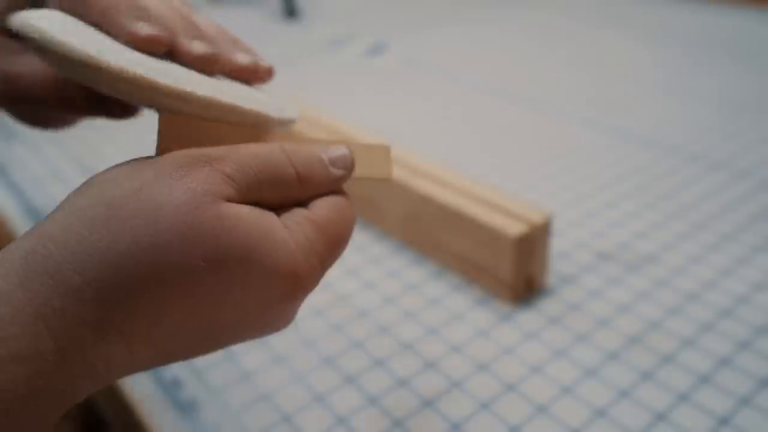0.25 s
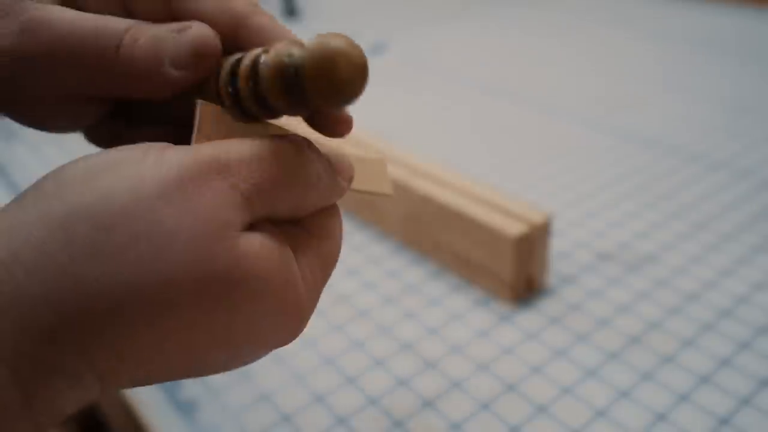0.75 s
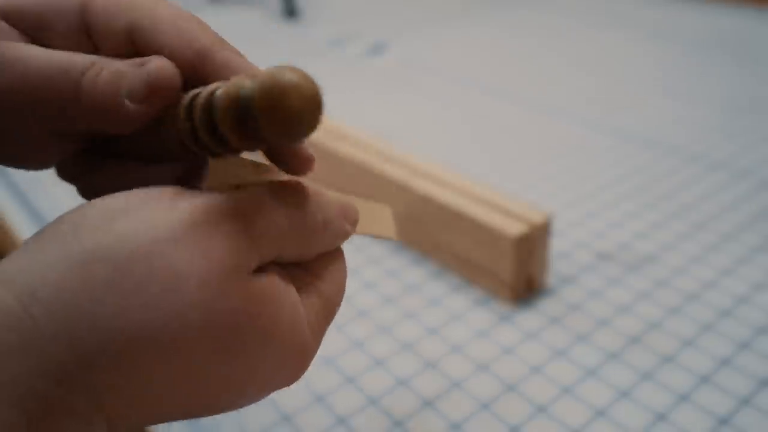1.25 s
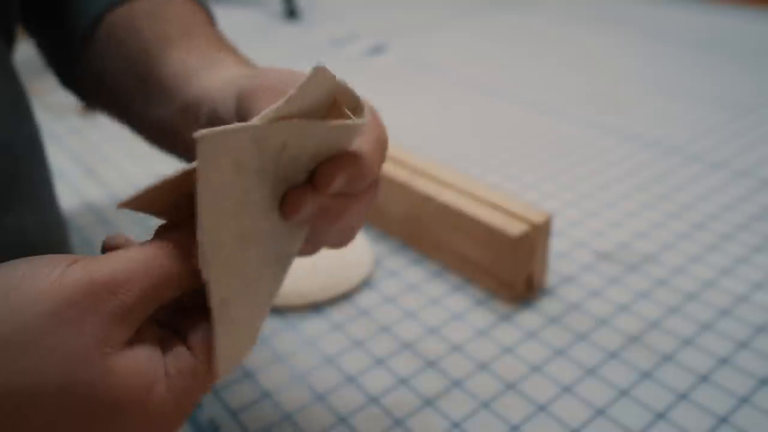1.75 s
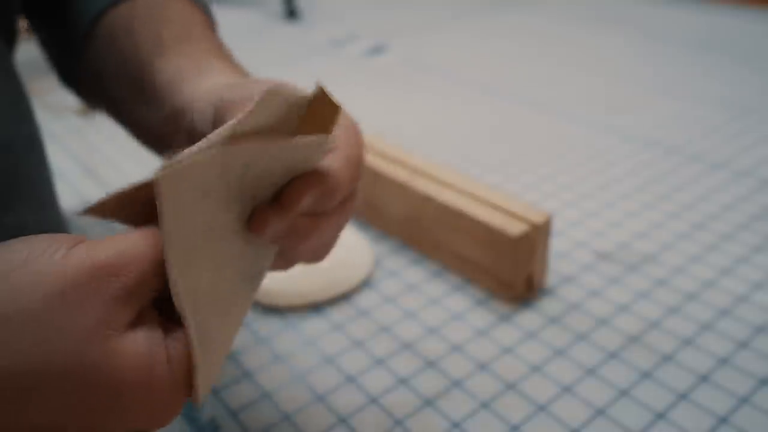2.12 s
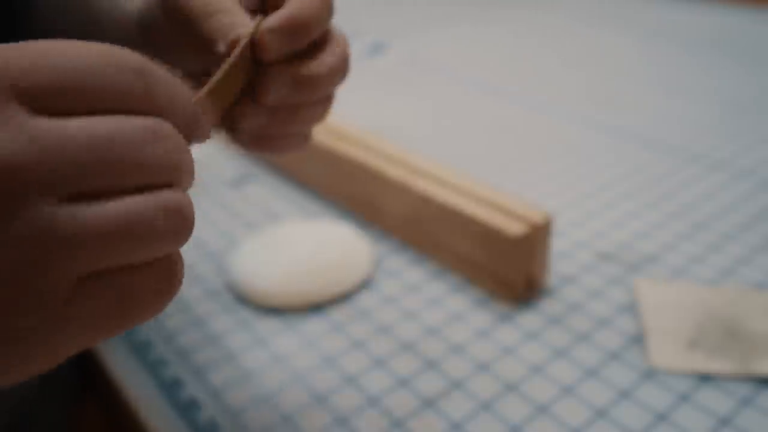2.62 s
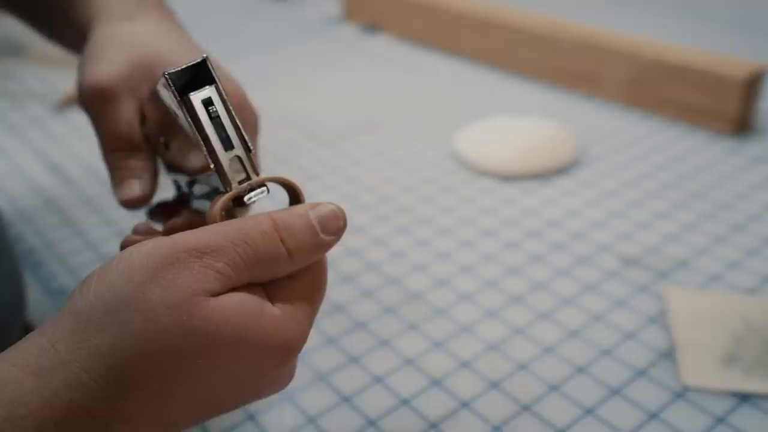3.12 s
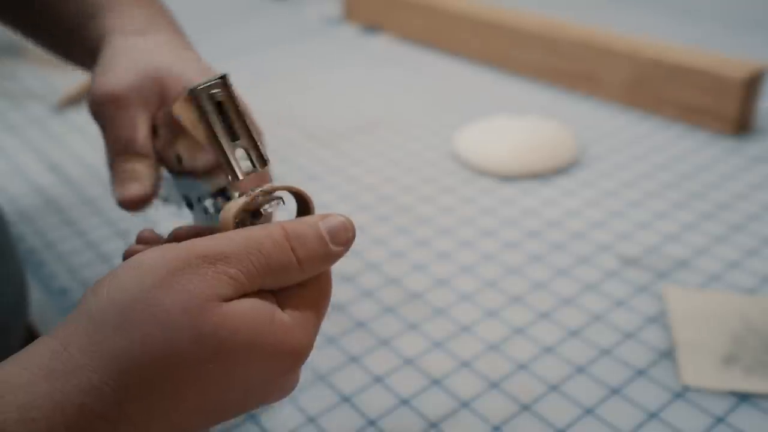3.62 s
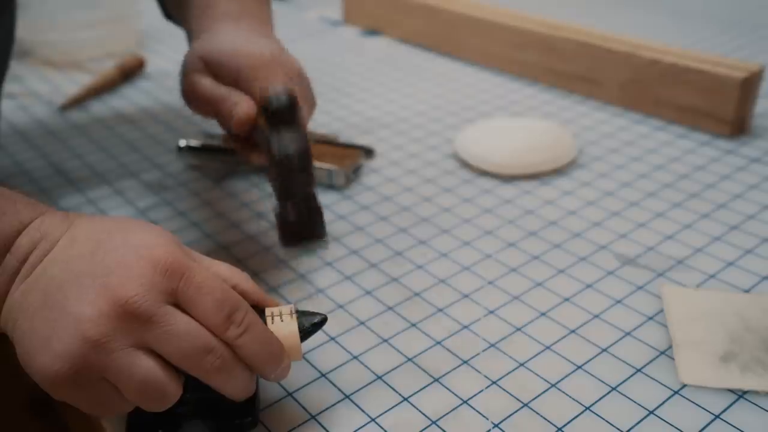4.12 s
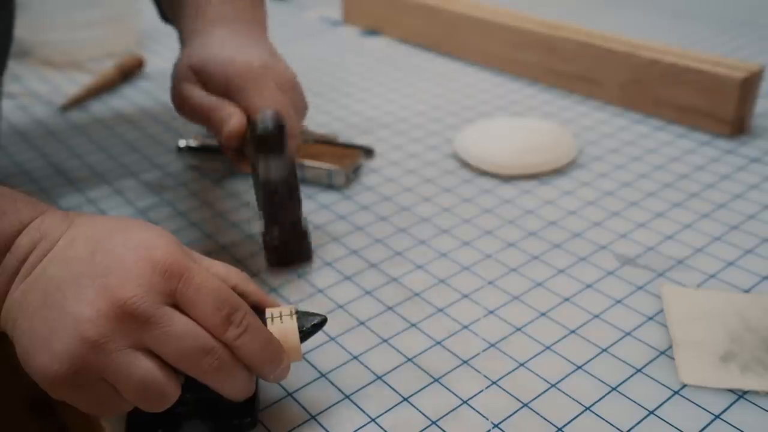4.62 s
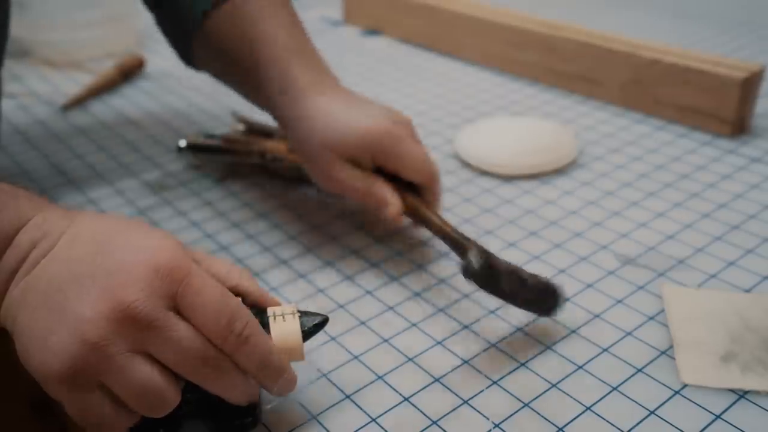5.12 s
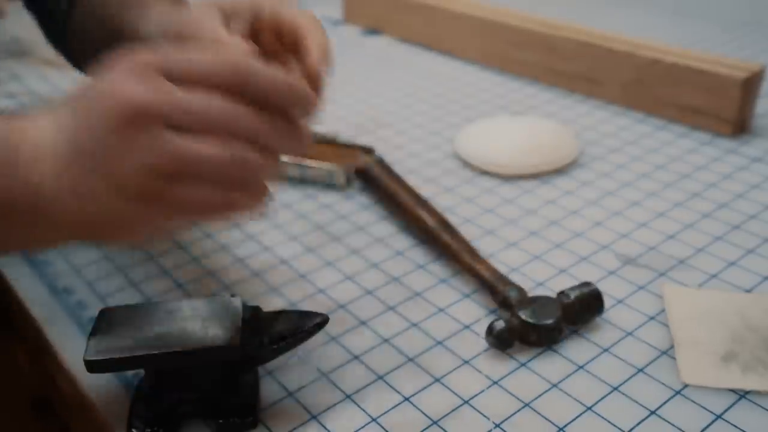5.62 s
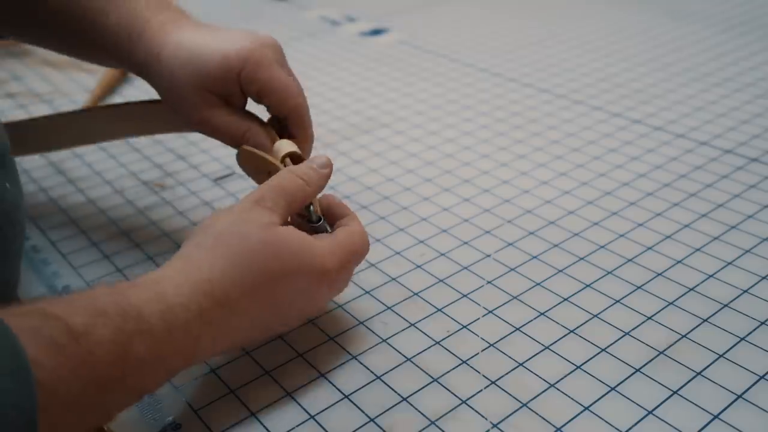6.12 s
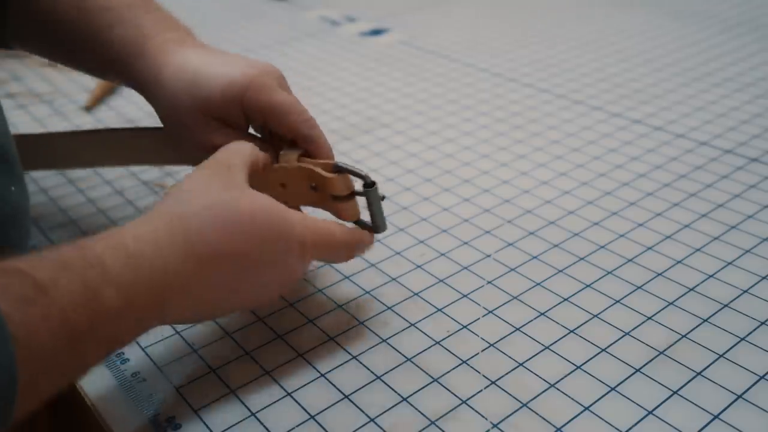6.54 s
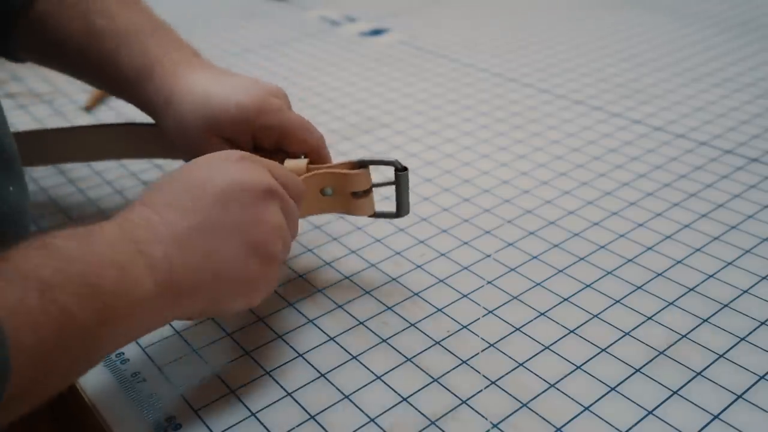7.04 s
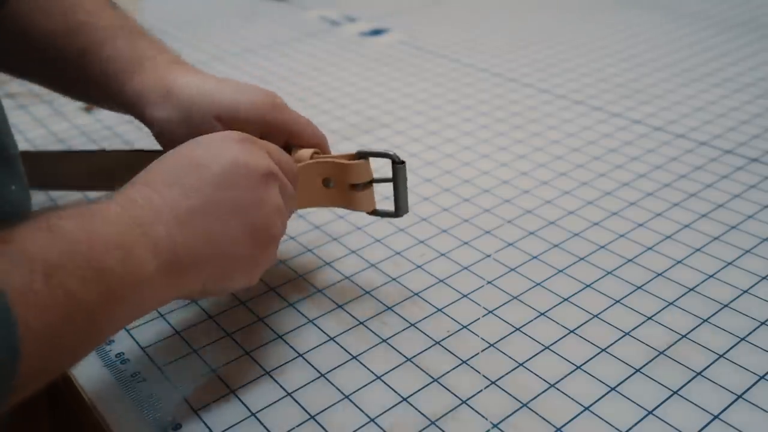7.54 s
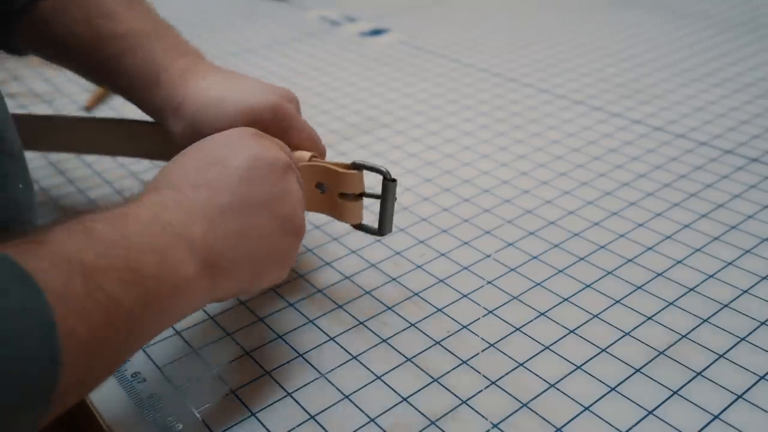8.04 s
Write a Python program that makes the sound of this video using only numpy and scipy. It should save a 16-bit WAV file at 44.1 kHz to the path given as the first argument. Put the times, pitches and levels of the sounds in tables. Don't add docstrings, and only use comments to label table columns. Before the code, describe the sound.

In a bare workshop with soft low ventilation noise and a faint motor whine that comes and goes, close work begins almost silently: a tiny tick or two and a faint stroke. From 0.65 to 1.5 s a wooden tool gives small dry ticks against leather. Quick back-and-forth canvas rubs follow from 1.6 to 2.4 s, then fainter brushing. A stapler clicks at 3.2 s and snaps loudly at 3.48 and 3.66 s, bright steel with a short rattle. Four loud hammer blows land at about 4.0, 4.3, 4.55 and 4.8 s, cracking hard with bench thump and swelling room echo. The hammer knocks down at 5.3 s and settles around 5.5 s. Afterwards fingers rustle on leather with small ticks; a steel buckle tinkles near 6.3 s, then clinks and rattles in a cluster at 7.7 to 8.0 s, ending with slight handling.

```python
import sys
import numpy as np
from scipy import signal
from scipy.fft import rfft, irfft
from scipy.io import wavfile

SR = 44100
rng = np.random.default_rng(int(sys.argv[2]) if len(sys.argv) > 2 else 0)


def dump(signal):
    limited = np.clip(np.atleast_2d(signal).T, -1, 1)
    pcm = np.round(limited * 32767).astype(np.int16)
    wavfile.write(sys.argv[1], SR, pcm)


def amplitude_ratio(level_db):
    exponent = np.asarray(level_db, float) / 20
    return 10 ** exponent


N = 364839


def at_hz(points, hz):
    table_hz, value = np.transpose(points)
    return np.interp(np.log(hz + 1), np.log(table_hz), value)


def rms_one(x):
    return x / np.sqrt(np.mean(x ** 2) + 1e-20)


def colour(x, spectrum):
    size = 8192
    cepstrum = irfft(np.log(amplitude_ratio(at_hz(spectrum, np.fft.rfftfreq(size, 1 / SR)))))
    cepstrum[1:size // 2] *= 2
    cepstrum[size // 2 + 1:] = 0
    response = irfft(np.exp(rfft(cepstrum)))
    return signal.fftconvolve(x, response / np.linalg.norm(response))[:N]


def band(x, low_hz, high_hz):
    edges = [low_hz, min(high_hz, SR / 2.2)]
    return signal.sosfilt(signal.butter(2, edges, "band", fs=SR, output="sos"), x)


def high_pass(x, order, hz):
    return signal.sosfilt(signal.butter(order, hz, "high", fs=SR, output="sos"), x)


def drift(rate_hz):
    r = np.exp(-2 * np.pi * rate_hz / SR)
    return rms_one(signal.lfilter([1], [1, -2 * r, r * r], rng.standard_normal(N + SR))[SR:])


def add(track, s, sound):
    i = round(s * SR)
    track[i:i + len(sound)] += sound[:N - i]


def ring(hz, db, t60):
    t = np.arange(round(1.5 * t60 * SR)) / SR
    return amplitude_ratio(db - 60 * t / t60) * np.sin(2 * np.pi * hz * t)


def strike(times, levels_db, modes, spread_db):
    at, out = np.round(np.asarray(times) * SR).astype(int), np.zeros(N)
    for hz, db, t60 in modes:
        clicks = np.full(N, 1e-18)
        np.add.at(clicks, at, amplitude_ratio(levels_db + db + spread_db * rng.standard_normal(len(at))))
        r, w = amplitude_ratio(-60 / (t60 * SR)), 2 * np.pi * hz / SR
        out += signal.lfilter([0, np.sin(w)], [1, -2 * r * np.cos(w), r * r], clicks)
    return out


def puff(decay_ms):
    t_ms = np.arange(512) / SR * 1000
    return rng.standard_normal(len(t_ms)) * np.exp(-t_ms / decay_ms) * np.minimum(t_ms / 0.13, 1)


# start in seconds, thump in dB, face crack in dB, crack pitch in Hz,
# contact hardness in Hz.
HAMMER_BLOWS = [
    (4.012, 3, 1, 7100, 2248),
    (4.2879, 6.5, 0.5, 8320, 3128),
    (4.5447, 5.5, 3.5, 6350, 14230),
    (4.8296, 6, -2.5, 9800, 2825),
]
# start in seconds, thump in dB, crack in dB, room share in dB.
LANDINGS = [(4.545, -24.5, 4.5, 6), (5.3302, -13, -36, -34), (5.333, -6.5, -20.5, -4.5),
            (5.345, -15, -29, -12), (5.362, -23, -35, -4), (5.506, -27, -41.5, -21),
            (5.5301, -11, -17.5, -6), (5.541, -50, -26, -1), (5.57, -37, -25.5, -7), (5.593, -37, -32, -8),
            (5.98, -38.5, -46.5, 9), (7.735, -21, -24, -1.5), (7.746, -43, -26, -22),
            (7.754, -20, -29, -31), (7.765, -44, -29, -14)]
# start in seconds, thump in dB, room share in dB, hardness in Hz.
BUMPS = [(3.954, -37, 16.5, 1034), (5.299, -30, -1, 1510), (5.301, -25, -9, 593), (5.888, -40, 9.5, 1200),
         (5.9, -22, -9, 1494), (5.996, -45, 6, 3000), (6.029, -50, -1, 1970), (7.588, -36.5, -8.5, 592),
         (7.687, -22, -10, 506), (7.8, -37.5, 9, 912), (8.225, -32.5, -13, 1490)]


def blow_rows():
    rows = [(*row, 1.5 + 0.59 * row[2]) for row in HAMMER_BLOWS]
    rows += [(s, db, crack_db, 3700, 3280, room_db) for s, db, crack_db, room_db in LANDINGS]
    rows += [(s, db, db - 31, 3000, hz, room_db) for s, db, room_db, hz in BUMPS]
    return sorted(rows)


# start in seconds, pitch in Hz, level in dB, decay t60 in seconds.
HAMMER_RING = [
    (4.014, 7600, -34.5, .043),
    (4.019, 13800, -50, .15),
    (4.289, 10200, -36, .05),
    (4.544, 7440, -29.5, .06),
    (4.545, 13010, -48, .15),
    (4.831, 7500, -33, .025),
]


def hammer_head():
    head = np.zeros(N)
    for s, hz, db, t60 in HAMMER_RING:
        add(head, s, ring(hz, db, t60))
    return head * amplitude_ratio(4 * drift(90))


# frequency in Hz, level in dB per Hz.
KNOCK_SPECTRUM = [(59, -27), (100, -16), (772, 3), (2520, -14.5), (3140, -2.5), (5170, -38), (8370, -40.5),
                  (12000, -56), (15600, -89.5), (22000, -120)]
# pitch in Hz, level in dB, decay t60 in seconds.
BENCH_MODES = [(104, -30.5, 0.24), (123, -27, 0.33), (179.5, -28.5, 0.25), (229.8, -19.5, 0.31),
               (306, -16, 0.12), (424, -16.5, 0.084), (607, -20.5, 0.06), (792, -10, 0.035),
               (1000, -9, 0.023), (1200, -15.5, 0.06)]
# pitch in Hz, level in dB, decay t60 in seconds.
HANDLE_MODES = [(523, -14.5, 0.06), (740, -17, 0.073), (964, -21, 0.042), (1427, -30, 0.04)]
# start in
# seconds, pitch in Hz, level in dB, decay t60 in seconds.
THUDS = [(3.224, 300, -43, 0.015), (3.225, 130, -46, .05), (3.48, 139.4, -44.5, .05),
         (3.48, 450.7, -39, 0.018), (3.662, 394.4, -39, 0.013), (5.301, 202, -20.5, 0.052),
         (5.3337, 515, 8.5, 0.0046), (5.3334, 1900, -16, .012), (5.347, 950, -26, .03),
         (5.362, 1800, -36, .015), (5.532, 1200, -26, .015), (5.545, 1000, -32, .04), (6.03, 260, -44, .06),
         (6.07, 310, -46, .06), (7.738, 900, -30, .04), (5.337, 195, -15, 0.089),
         (5.531, 367, -13.5, 0.024), (5.572, 350, -20, 0.024), (5.591, 350, -19, 0.017),
         (7.736, 422, -14.5, 0.016), (7.746, 350, -13.5, 0.012), (7.755, 334, -16, 0.015)]


def bench_top(push, rows):
    s, thump_db = np.array(rows)[:, :2].T
    mat_db = -13 * (s > HAMMER_BLOWS[-1][0])
    modes = strike(s + 0.0012, thump_db + mat_db, BENCH_MODES, spread_db=2)
    near = colour(push, KNOCK_SPECTRUM) + band(modes, 61, 1500)
    for s, db, *_ in LANDINGS:
        for hz, mode_db, t60 in HANDLE_MODES:
            add(near, s, ring(hz, db + mode_db, t60))
    for s, hz, db, t60 in THUDS:
        add(near, s, ring(hz, db, t60))
    return near


# stage start in seconds, weight in dB, bite in dB.
BLOW_COLOUR = [
    (0, 0, 0),
    (4.0, 4.5, -2.5),
    (4.28, -2.5, -0.5),
    (4.53, -8, 3.5),
    (4.82, 0, -4),
    (5.2, 3.5, -11.5),
    (5.5, 3, 4.5),
    (5.8, 4, 8),
    (7.5, 11, 4),
]
# body in dB, edge in dB, crack's room share in dB.
BLOW_BANDS = [(0.5, 0, -0.5), (-2.5, 3, -4), (-1, 3, -3.5), (-0.5, -3, -3.5), (2, -3, 0.5), (-2, 0, 3.5),
              (2, -8, 4.5), (-2.5, 1, 0), (1, -5, 12.5)]
# frequency in Hz, level in dB per Hz.
BENCH_SPECTRUM = [(18, -70.5), (30, -37.5), (112, -2.5), (199, -3.5), (233, -2), (336, -5.5), (426, -4.5),
                  (666, -10.5), (822, -9.5), (1590, -19.5), (2170, -26), (3490, -21.5), (6210, -39),
                  (13300, -48), (16000, -91.5)]


def bench_into_room(far, crack):
    start, weight_db, bite_db = np.transpose(BLOW_COLOUR)
    body_db, edge_db, crack_room_db = np.transpose(BLOW_BANDS)
    stage = np.searchsorted(start * SR, np.arange(N), side="right").clip(1) - 1

    def change(db):
        return (amplitude_ratio(db) - 1)[stage]

    weight = signal.lfilter(*signal.butter(1, 400, "low", fs=SR), far)
    bite = signal.lfilter(*signal.butter(1, 1800, "high", fs=SR), far)
    far = far + change(weight_db) * weight + change(bite_db) * bite
    far = far + change(body_db) * band(far, 800, 2000) + change(edge_db) * band(far, 4000, 6500)
    crack_far = band(crack, 2000, 6500) * amplitude_ratio(crack_room_db + 3)[stage]
    return colour(far, BENCH_SPECTRUM), crack_far


def blows():
    push, far, crack = np.zeros((3, N))
    rows = blow_rows()
    for s, thump_db, crack_db, crack_hz, hardness_hz, room_db in rows:
        contact = signal.unit_impulse(512) + .04 * puff(1.5)
        soft = signal.lfilter(*signal.butter(2, min(hardness_hz, SR / 3), fs=SR), contact)
        soft *= amplitude_ratio(thump_db + 9)
        add(push, s + 0.00084, soft)
        add(far, s + 0.00044, amplitude_ratio(room_db + 2) * soft)
        edge = band(signal.unit_impulse(512, 2) * 3 + puff(.5), crack_hz / 1.5, crack_hz * 1.6)
        edge = band(edge, crack_hz / 2.5, crack_hz * 1.6)
        add(crack, s, amplitude_ratio(crack_db) * edge / np.abs(edge).max())
    near = bench_top(push, rows)
    far, crack_far = bench_into_room(far, crack)
    rumble_cut_hz = 55
    near = high_pass(high_pass(near, 2, rumble_cut_hz), 2, rumble_cut_hz)
    return near, high_pass(far, 2, rumble_cut_hz), crack + hammer_head(), crack_far


# start in seconds, peak in dB, grinding time in ms.
STAPLER_CONTACTS = [(3.2193, -34, 3.2), (3.2238, -11.5, 8.2), (3.235, -18.5, 3.06), (3.241, -27, 2.5),
                    (3.472, -28, 4.3), (3.477, -4, 3.6), (3.481, 2, 5.9), (3.492, -16, 5.5),
                    (3.509, -6, 4.1), (3.630, -17, 4.8), (3.654, -26, 10), (3.6615, 1, 4.24),
                    (3.665, -4.5, 4.37), (3.674, -16.5, 5.6), (3.713, -17, 1.14)]
# from seconds, to seconds.
LATCH_SPANS = [
    (3.5, 3.52),
    (3.62, 3.64),
]
# frequency in Hz, level in dB per Hz.
SNAP_SPECTRUM = [(290, -63.5), (500, -47.5), (1400, 1), (2290, -10), (2730, 1.5), (3390, 5), (5310, -6.5),
                 (12500, -3.5), (16000, -24)]
# frequency in Hz, level in dB per Hz.
LATCH_SPECTRUM = [(900, -27.5), (1500, -14.5), (2400, -17.5), (3400, 7.5), (4300, -3.5), (5250, -0.5),
                  (6300, -8.5), (12000, -8.5), (16000, -24.5)]
BODY_MODES_HZ = [1300, 1440, 1500, 1720, 2870, 3130, 3520, 3820, 4000, 4900, 5230, 7400, 8650, 11400]
# decay t60 in seconds, dB on closing, dB on driving, dB on opening.
BODY_GRIP = [(0.068, -22, -9, -8), (.05, -13.5, -4, -3.5), (.035, -0.5, -9, -11.5), (0.028, 9, -7, -6.5),
             (0.02, -16.5, -3, 6), (0.031, 1, -2, -7), (0.017, -13.5, 2.5, -11), (.035, -8, -8.5, -5.5),
             (0.051, -3.5, -7, -4.5), (.02, -12, -7, -3), (0.014, 6.5, -1, -7),
             (0.019, -15.5, -12.5, -12.5), (.03, -8.5, -16.5, -9), (0.014, -10, -16.5, -16)]
GRIP_CHANGES_S = [3.4, 3.6]
# start in seconds, pitch in Hz, level in dB, decay t60 in seconds.
SPRING = [
    (3.2244, 3681, -50, 1.),
    (3.2244, 8650, -66, .5),
    (3.2244, 7400, -60, .4),
    (3.481, 3686, -44, .2),
]
# start in seconds, pitch in Hz, level in dB, decay t60 in seconds.
MAGAZINE = [(3.2245, 1500, -26, .04), (3.2245, 5200, -28, .03), (3.483, 3500, -18, .04),
            (3.483, 2200, -36, .2), (3.226, 2300, -48, .25), (3.225, 1480, -42, 0.36),
            (3.226, 1725, -44, 0.27), (3.226, 4081, -40, 0.25), (3.225, 3190, -45, 0.23),
            (3.226, 5170, -51, 0.23), (3.483, 1378, -32, 0.28), (3.482, 3000, -33, .3),
            (3.483, 3900, -37, 0.27), (3.664, 1260, -39.5, 0.27), (3.664, 1435, -37.5, 0.31),
            (3.664, 2898, -29, 0.29), (3.664, 3830, -34, 0.25), (3.663, 4050, -39.5, .3)]


def stapler():
    grind, latch, magazine, body = np.zeros((4, N))
    times, levels_db = [], []
    for s, db, ms in STAPLER_CONTACTS:
        t = np.linspace(0, 2, round(2 * ms * SR / 1000))
        shape = np.minimum(t / .15, 1) * np.exp(-t ** 4 * 2)
        is_latch = any(a < s < b for a, b in LATCH_SPANS)
        add(latch if is_latch else grind, s, amplitude_ratio(db - 6.5) * shape * rng.standard_normal(len(t)))
        times += list(s + ms / 1000 * rng.random(6))
        levels_db += [db - 28] * 6
    phase = np.searchsorted(GRIP_CHANGES_S, times)
    for hz, (t60, *grip_db) in zip(BODY_MODES_HZ, BODY_GRIP):
        body += strike(times, np.array(levels_db) + np.array(grip_db)[phase], [(hz, 0, t60)], spread_db=4)
    for s, hz, db, t60 in SPRING:
        add(body, s, ring(hz, db, t60))
    rattle = drift(85)
    for k, (s, hz, db, t60) in enumerate(MAGAZINE):
        tone = ring(hz, db + 3, t60)
        add(magazine, s, tone * np.roll(rattle, -k * SR // 2)[:len(tone)])
    snaps = colour(grind, SNAP_SPECTRUM) + colour(latch, LATCH_SPECTRUM) + body + magazine
    limit = .7
    return band(limit * np.tanh(snaps / limit), 1100, 19000)


# start in seconds, frame in dB, bar in dB, roller in dB, prong in dB.
TOUCHES = [(6.3118, -41.5, -45, -87, -61), (6.3288, -29, -32, -48, -38), (6.336, -34, -37, -65, -49),
           (6.446, -39.5, -47, -48, -46), (6.5463, -41.5, -45, -67, -44), (6.877, -51, -44, -64, -53.5),
           (6.904, -43, -46.5, -59.5, -50.5), (7.3562, -36.5, -48, -60, -41), (7.484, -32, -62, -56, -68),
           (7.549, -43.5, -57, -63, -52), (7.679, -37, -51, -56, -43.5), (7.737, -46, -55, -51, -50),
           (7.7439, -32, -51, -46, -44), (7.765, -43, -54, -52, -60), (7.774, -31, -53, -49, -48),
           (7.776, -37, -52, -42, -38), (7.7878, -32, -49, -46, -43), (7.7936, -31, -41, -29.5, -45),
           (7.7989, -22, -53, -37, -41), (7.804, -26, -56, -38, -42), (7.807, -50, -52, -47, -42),
           (7.955, -22, -35, -39.5, -39)]
# start in seconds, frame in dB.
NUDGES = [(6.235, -51), (6.344, -28.5), (6.368, -38), (6.385, -38), (6.4549, -40), (6.5145, -57),
          (6.5572, -49.5), (6.71, -45.5), (7.368, -46), (7.4675, -40), (7.495, -44.5), (7.5, -55),
          (7.559, -56.5), (7.689, -45), (7.962, -36), (8.044, -40.5), (8.0702, -48.5), (8.2068, -49.5)]
# from seconds, to seconds.
DANGLING = [
    (6.3, 6.4),
    (6.44, 6.45),
    (7.736, 7.95),
]
# pitch in Hz, level in dB, decay t60 in seconds.
FRAME = [(3460, -8, .25), (3620, -19, .15), (3830, -9, .15), (3890, -1, .3), (3955, -3, .25),
         (4390, -16, .12)]
# pitch in Hz, level in dB, decay t60 in seconds.
BAR = [(4720, -13, .08), (5020, -11, .1), (5200, -9, .1), (5270, -4, .11), (5600, -17, .08)]
# pitch in Hz, level in dB, decay t60 in seconds.
ROLLER = [(8560, -10, 0.2), (9870, -4.5, 0.16)]
# pitch in Hz, level in dB, decay t60 in seconds.
PRONG = [(13730, 11, 0.11), (14700, -13, .06)]


def buckle():
    rings, clicks = np.zeros((2, N))
    nudges = [(s, db, db - 23, db - 21, db - 21) for s, db in NUDGES]
    touches = [tuple(row) for row in TOUCHES] + nudges
    for s, frame_db, bar_db, roller_db, prong_db in sorted(touches):
        held = not any(a < s < b for a, b in DANGLING)
        ring_share, loss_db, detune = (.17, -1, .015) if held else (.3, 0, 0)
        parts = [(FRAME, frame_db - 8.5), (BAR, bar_db), (ROLLER, roller_db), (PRONG, prong_db - 11)]
        for modes, part_db in parts:
            for hz, db, t60 in modes:
                luck, bend = rng.standard_normal(2)
                level_db = db + part_db + loss_db + 0.94 * luck
                add(rings, s, ring(hz * (1 + detune * bend), level_db, t60 * ring_share))
        burst = puff(1.0) * amplitude_ratio(0 if held else -14)
        low = amplitude_ratio(frame_db + 14) * band(band(burst, 3440, 4640), 3160, 11900)
        high = (amplitude_ratio(roller_db + 16.5) + amplitude_ratio(prong_db - 8)) * band(burst, 6200, 16000)
        add(clicks, s, low + high)
    return high_pass(rings * amplitude_ratio(2.5 * drift(80)) + clicks, 4, 2400)


# start in seconds, length in seconds, level in dB, brightness in dB,
# fullness in dB.
STROKES = [(0.265, 0.18, -64.5, 4.5, 4), (1.58, 0.069, -43, 3.5, -0.5), (1.686, 0.14, -56.5, 4.5, 1),
           (1.877, 0.1, -43.5, -0.5, 2), (2.018, 0.099, -47.5, 2.5, -1), (2.146, 0.093, -42.5, 2, 2.5),
           (2.299, 0.078, -55.5, 3.5, 3), (2.486, 0.023, -61, 10, 5), (2.518, 0.13, -63.5, 2.5, 3),
           (2.652, 0.18, -68, 6.5, 4), (2.88, 0.085, -72, 5, 2), (5.385, 0.027, -68, 13, 0),
           (5.41, 0.03, -62, 12, 0), (5.659, 0.036, -69.5, -1, -3.5)]
# start in seconds, tick in dB, then top, knock
# and grain in dB relative to the tick.
SLICKER = [
    (0.6487, -60.5, 5, 2, 4),
    (0.8654, -60, -10, 4, -2),
    (0.9644, -42.5, -14, -13, -1.5),
    (1.0505, -51, -12, -2.5, -3),
    (1.1582, -40.5, -4, -8, 4),
    (1.25, -48.5, -20, -1, -1),
    (1.3793, -49, -11.5, -1.5, 3),
    (1.3828, -38.5, -30, -10, -10.5),
    (1.475, -43, -11, -4, -4.5),
]
# start in seconds, length in seconds, level in dB, edge whisper in dB,
# top in dB relative.
FINGERS = [(5.827, 0.37, -68, -83.5, -5.5), (6.218, 0.14, -73.5, -76.5, 1.5),
           (6.326, 0.33, -69.5, -74, 1.5), (6.663, 0.26, -66, -73.5, -2), (6.932, 0.2, -69.5, -75.5, -1),
           (7.138, .21, -78, -93, -5), (7.344, 0.056, -74.5, -83, 5), (7.41, 0.09, -82, -90, 8),
           (7.52, 0.11, -86, -94, -6), (7.635, .09, -65, -87, -11), (7.737, 0.53, -69.5, -94, -10)]
# frequency in Hz, level in dB per Hz.
CANVAS_SPECTRUM = [(410, -27), (700, -15), (1050, -12.5), (1250, -6.5), (1890, -4.5), (2220, -9),
                   (2840, 2.5), (4920, -14.5), (10100, -18), (13000, -27.5), (16000, -35)]
# frequency in Hz, level in dB per Hz.
SKIN_SPECTRUM = [(2350, -8.5), (4000, -3.5), (5700, -9.5), (6820, -12), (7700, -17), (8360, -10.5),
                 (9330, -10), (12800, -16), (16000, -23)]


def rubbing():
    dull, bright, full, fingers, tips, whisper = np.zeros((6, N))
    slides = [(s + .014, .046, -78, 6, 0) for s, *_ in SLICKER]
    for s, length, db, bright_db, full_db in list(STROKES) + slides:
        speed = np.sin(np.pi * np.linspace(0, 1, round((length + .006) * SR))) ** .55
        add(dull, s, amplitude_ratio(db) * speed)
        add(full, s, (amplitude_ratio(db + full_db) - amplitude_ratio(db)) * speed)
        add(bright, s, amplitude_ratio(db + bright_db) * speed)
    for s, length, db, whisper_db, top_db in FINGERS:
        slide = np.sin(np.pi * np.linspace(0, 1, round(length * SR))) ** 0.12
        add(fingers, s, amplitude_ratio(db + 6.5) * slide)
        add(tips, s, amplitude_ratio(db + 6.5 + top_db) * slide)
        add(whisper, s, amplitude_ratio(whisper_db) * slide)
    slip_db = 2.53 * rng.exponential(1, N) + 0.33 * drift(75) + 1.2 * drift(22)
    slips = rng.standard_normal(N) * amplitude_ratio(slip_db)
    fibres = rms_one(colour(slips, CANVAS_SPECTRUM))
    top = high_pass(fibres, 2, 4500)
    cloth = dull * (fibres - top) + full * band(fibres, 1100, 2250) + bright * top
    skin = rms_one(colour(slips, SKIN_SPECTRUM))
    pads = band(skin, 1120, 5500) * amplitude_ratio(3.0 * drift(15))
    ridges = band(skin, 5500, 8700) * amplitude_ratio(2.2 * drift(22))
    ridges += band(skin, 10000, 18000) * amplitude_ratio(3.1 * drift(11))
    edge = rms_one(band(rng.standard_normal(N), 6200, 7200)) * amplitude_ratio(1.4 * drift(22))
    return cloth + fingers * pads + tips * ridges + whisper * edge


# start in
# seconds, peak in dB, pitch in Hz, top in dB relative.
TICKS = [(0.057, -50, 3000, -1), (0.3564, -55, 3300, -17), (1.73, -48, 3220, -21),
         (2.367, -35.5, 3280, -21.5), (3.0704, -44.5, 3370, -12.5), (7.801, -26, 5330, -30),
         (5.172, -60, 6820, -3), (5.3794, -53, 5000, 9), (5.301, -44, 2000, -25), (5.318, -49, 2800, -30),
         (5.475, -49, 4500, -20), (5.531, -24.5, 6330, -16), (5.532, -30, 2470, -30), (5.9, -46, 2290, -20),
         (5.9788, -31, 2500, -37), (6.0236, -41.5, 2600, -9), (6.05, -40.5, 4000, -37),
         (6.146, -45.5, 3920, -25), (6.172, -44, 3500, -3.5), (6.366, -43, 5220, -12),
         (6.436, -47.5, 4920, 14), (6.514, -62, 5060, 11), (6.665, -54.5, 6600, -5), (7.019, -59, 5840, -6),
         (7.028, -52.5, 5940, -5), (7.036, -47, 4230, -3), (7.0468, -53, 3010, -12.5), (7.06, -54, 4010, 3),
         (7.083, -43.5, 6050, -9), (7.0946, -50, 3240, -12), (7.232, -44, 3930, -5.5),
         (7.2593, -53, 4030, -14.5), (7.646, -35.5, 3880, -11), (7.9546, -30.5, 3230, -23),
         (7.955, -25, 4580, -20), (8.041, -37, 4800, -15), (6.331, -45, 3170, -22), (5.507, -36, 1500, -20),
         (5.57, -25.5, 2850, -30), (8.146, -44, 5800, 4), (8.2194, -52, 2840, -22)]


def ticks():
    out = np.zeros(N)
    turns = []
    for s, db, top_db, knock_db, grain_db in SLICKER:
        turns += [(s, db, 3500, top_db), (s, db + knock_db, 2080, -40), (s, db + grain_db, 5500, -40)]
    for s, db, hz, top_db in list(TICKS) + turns:
        burst = signal.unit_impulse(512, 2) * 4.05 + puff(1.0)
        body = band(burst, hz / 1.2, hz * 1.1)
        body += 0.23 * band(burst, hz, hz * 1.5) + 0.5 * band(burst, hz / 1.7, hz / 1.33)
        edge = band(burst, 6600, 13200)
        add(out, s, amplitude_ratio(db) * (body / np.abs(body).max() + amplitude_ratio(top_db) * edge / np.abs(edge).max()))
    return out


def late_crack(crack_far):
    spread_s = .05
    t = np.arange(round(4 * spread_s * SR)) / SR / spread_s
    scatter = rng.standard_normal(len(t)) * t ** 3 * np.exp(-3 * t)
    return amplitude_ratio(-22.5) * signal.fftconvolve(crack_far, scatter / np.linalg.norm(scatter))[:N]


# frequency in Hz, decay t60 in seconds.
WORKSHOP = [(60, 0.34), (160, 0.37), (420, 0.42), (1100, 0.52), (3000, 0.44), (6000, 0.33), (10000, 0.12),
            (16000, 0.28)]


def workshop(x, build_ms, wall_db):
    t, tail = np.arange(SR) / SR, 0
    wall = 1 + amplitude_ratio(wall_db) * np.clip((t - .035) / .012, 0, 1)
    for hz in 40 * 2 ** np.arange(0, 8.8, 1 / 3):
        t60 = at_hz(WORKSHOP, hz)
        echoes = band(rng.standard_normal(SR), hz / 1.081, hz * 1.204) * amplitude_ratio(-60 * t / t60)
        echoes *= (1 - np.exp(-t * 1000 / build_ms)) * wall
        tail = tail + rms_one(echoes) * np.sqrt(hz * t60)
    return signal.fftconvolve(x, tail / np.linalg.norm(tail))[:N]


# frequency in Hz, level in dB per Hz.
AIR_SPECTRUM = [(20, -32), (40, -4), (76, -12), (120, -4), (200, -5), (400, -11.5), (900, -14), (1100, -21),
                (2000, -22), (2400, -27), (3200, -21), (4500, -34.5), (8000, -42), (16500, -47.5)]
# pitch in Hz, width in Hz, rms level in dB.
DUCT = [(259.4, 13, -68), (348.8, 9.7, -72)]
# on in seconds, off in seconds, level in dB.
MOTOR_RUNS = [
    (0.05, .45, -81),
    (0.717, 1.187, -73),
    (2.687, 4.513, -71),
    (5.904, 7.35, -69.5),
    (8.1, 8.402, -68.5),
]


def background():
    air = rms_one(colour(rng.standard_normal(N), AIR_SPECTRUM)) * amplitude_ratio(-59.5 + 1.4 * drift(0.59))
    for hz, width_hz, db in DUCT:
        air += amplitude_ratio(db) * rms_one(band(rng.standard_normal(N), hz - width_hz / 2, hz + width_hz / 2))
    t, motor, fade_s = np.arange(N) / SR, np.zeros(N), 0.14
    phase = 2 * np.pi * np.cumsum(930 + 5 * drift(20)) / SR
    for on, off, db in MOTOR_RUNS:
        motor += amplitude_ratio(db) * np.clip(np.minimum(t - on, off - t) / fade_s + .5, 0, 1)
    return air + np.sqrt(2) * motor * amplitude_ratio(2.5 * drift(12)) * np.sin(phase)


def scene():
    thump, thump_far, crack, crack_far = blows()
    staples, steel = stapler(), buckle()
    small = rubbing() + ticks()
    sends = amplitude_ratio(-19.5) * small + amplitude_ratio(-14.5) * steel + amplitude_ratio(-15) * staples + amplitude_ratio(-18.5) * crack_far
    wet = workshop(sends, build_ms=1.5, wall_db=-9)
    wet += amplitude_ratio(2.5) * workshop(thump_far, build_ms=2.8, wall_db=-10.5)
    close = small + steel + staples + crack + thump
    return (close + wet + late_crack(crack_far) + background())[None]


def band_limit(x):
    return signal.sosfilt(signal.butter(12, 16810, fs=SR, output="sos"), x)


def record(dry):
    recovered_db = 170 * np.arange(N) / SR
    over_db = np.maximum(20 * np.log10(np.abs(dry[0]) + 1e-9) + 0.5, 0)
    duck_db = np.maximum.accumulate(over_db + recovered_db) - recovered_db
    r = np.exp(-1 / (0.0033 * SR))
    held = dry * amplitude_ratio(-signal.lfilter([1 - r], [1, -r], duck_db))
    clipped = np.clip(held, -.88, .88)
    mix = signal.sosfilt(signal.cheby2(12, 42, 16500, fs=SR, output="sos"), clipped)
    return band_limit(mix)


dry = scene()
out = record(dry)
dump(out)
```